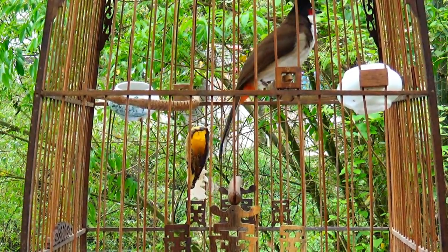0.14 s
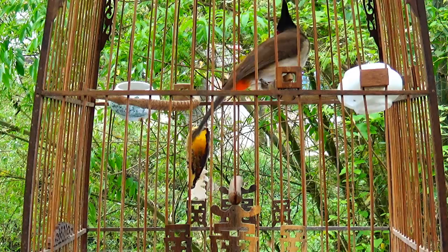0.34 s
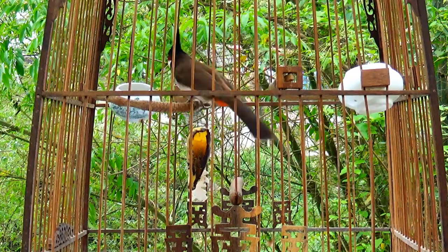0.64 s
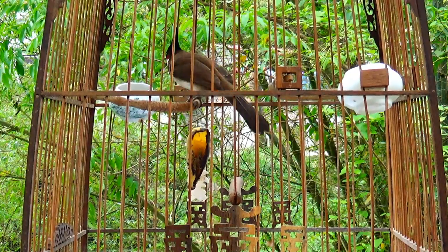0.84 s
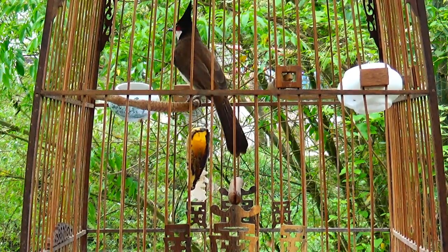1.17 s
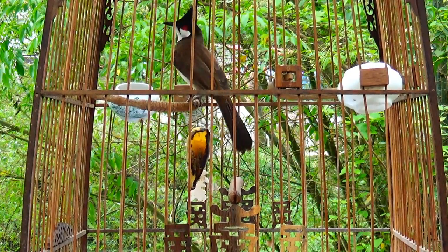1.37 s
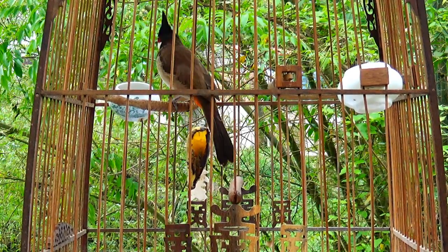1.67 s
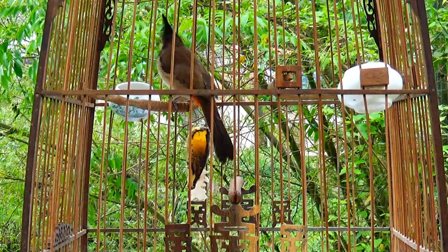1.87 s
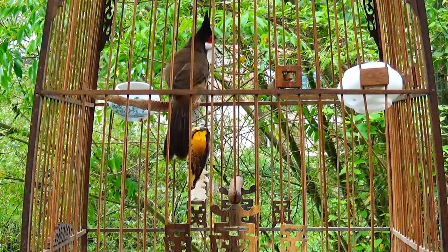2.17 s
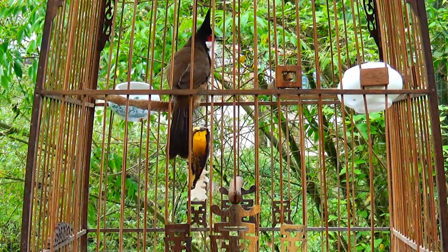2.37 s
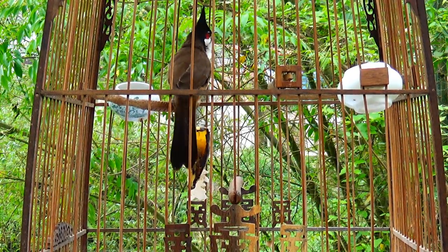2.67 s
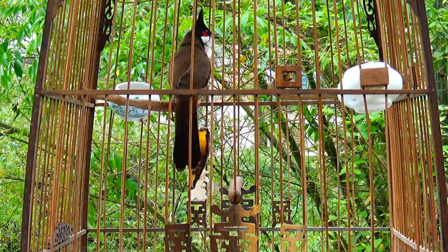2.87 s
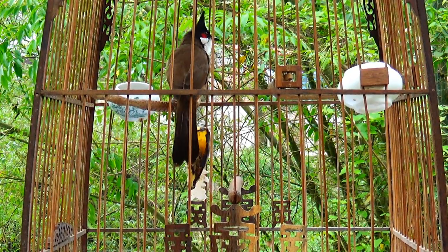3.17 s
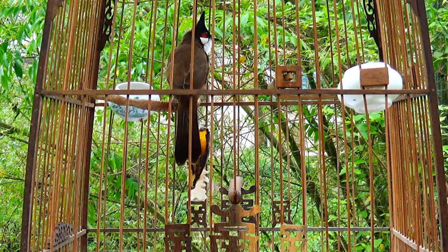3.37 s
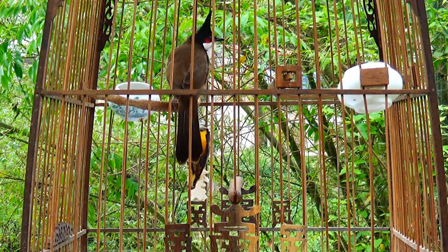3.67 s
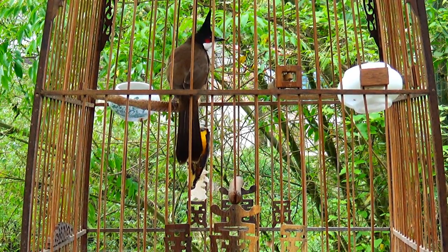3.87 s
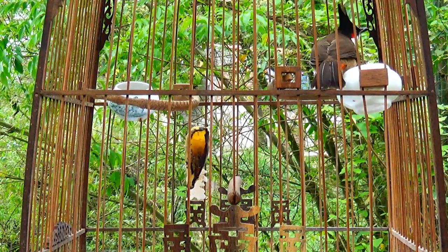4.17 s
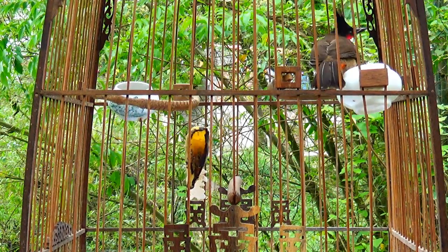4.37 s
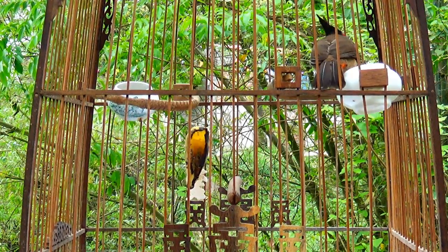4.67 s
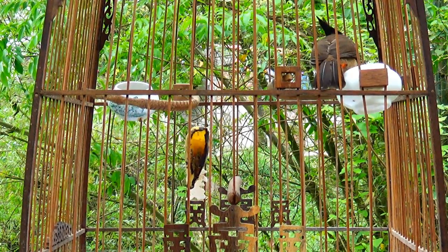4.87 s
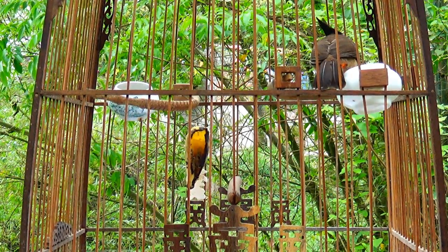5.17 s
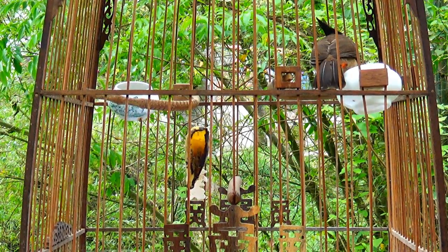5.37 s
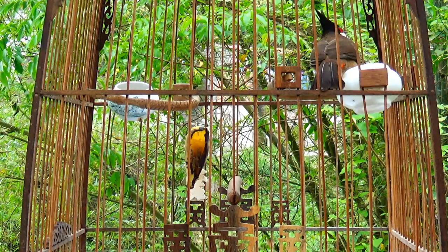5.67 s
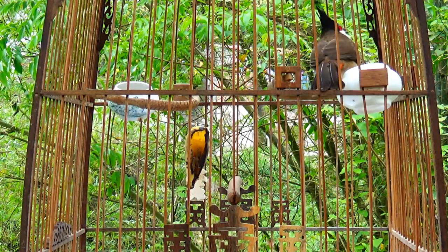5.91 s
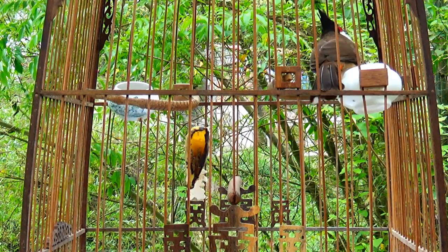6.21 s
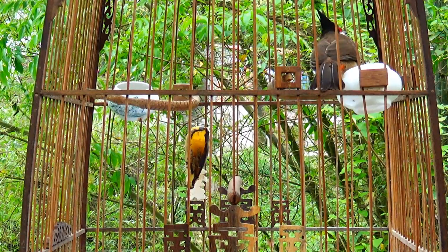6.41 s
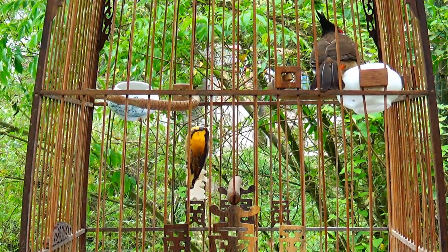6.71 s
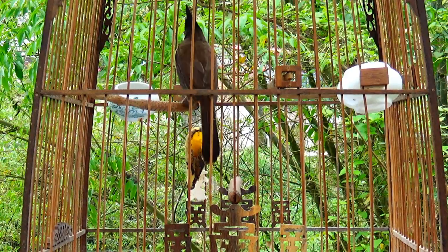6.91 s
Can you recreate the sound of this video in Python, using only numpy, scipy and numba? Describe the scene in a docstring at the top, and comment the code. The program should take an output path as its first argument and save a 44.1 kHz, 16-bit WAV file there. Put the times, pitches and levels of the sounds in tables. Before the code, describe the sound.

A garden ambience of soft low hum and leafy hiss continues throughout, swelling slightly. At 0 s the echo of a bird's whistle dies away with tiny chips. Around 0.5-0.7 s dry wing ticks and a faint rustle cross the cage. Soft distant whistles slide upward near 0.9, 1.8 and 2.4 s, with buzzy chips at 1.5-2 s. From 2.2 to 3 s the near songbird sings loudly: a sharp upward flick, then rapid, clear, trilled whistles around 2-4 kHz, falling at the end. A single cluck comes at 3.3 s. Distant hoarse rooster crowing spans 3.9-5.2 s, while a thin high insect buzz runs from 4.2 to 6.8 s; a low hum swells at 4.5-5 s with small chips. The second loud phrase starts with one high whistle at 5.7 s, then tumbles quickly from 5.85 to 6.3 s, descending. A far rooster crows again at 6.1-6.8 s. A faint falling whistle begins at the close.

```python
"""Caged bulbul in a garden

A caged bulbul sings two loud phrases of trilled, sliding whistles: frequency-modulated tones with faint overtones.
Soft arched chips lie between them, and a flutter of filtered-noise ticks and rustle crosses the cage once.
Birds in the trees slide pure whistles; a fowl clucks and a far rooster crows, harmonics through a throat.
Insects buzz as wing strokes ring a high resonance; a hum swells once; echoes and outdoor noise surround it all.
"""
import sys
import numpy as np
from scipy import signal
from scipy.fft import rfft, irfft, next_fast_len
from scipy.io import wavfile
from scipy.ndimage import uniform_filter1d, minimum_filter1d
from numba import njit

SR = 44100
rng = np.random.default_rng(int(sys.argv[2]) if len(sys.argv) > 2 else 0)


def unload_wav(signal):
    """Save mono or channel-first audio to the path in sys.argv[1] as 16-bit WAV at rate SR, clipped to [-1, 1]."""
    wavfile.write(
        sys.argv[1],
        SR,
        np.round(np.clip(np.atleast_2d(signal).T, -1, 1) * 32767).astype(np.int16),
    )


N = 310905
LEAD = 8820  # samples before time 0, cut off at the end, so that sounds and echoes are already under way
T = np.arange(-LEAD, N) / SR  # time in s
TOP_HZ = 15850  # upper limit of the sound

# the bulbul hops to the left perch, later back to the right: start_s, end_s of the first hop, then of the second
HOP = (.4, .7, 4., 4.3)


def amp(db):
    """Level law: decibels to amplitude gain."""
    return 10 ** (np.asarray(db) / 20)


def unit(x):
    """Normalisation to rms 1."""
    return x / np.sqrt(np.mean(x ** 2))


def colour(hz, points):
    """Spectral envelope: gain at hz, from (Hz, dB) points joined along log frequency."""
    f, db = np.transpose(points)
    return amp(np.interp(np.log(np.maximum(hz, 1)), np.log(f), db))


def resonance(hz, centre_hz, width_hz):
    """Gain of a single resonance, 1 at its centre and 3 dB down at the edges of its width."""
    return 1 / np.sqrt(1 + ((hz - centre_hz) / (width_hz / 2)) ** 2)


def noise(size, shape):
    """Filtered noise: a white spectrum is multiplied by shape(Hz) and scaled to rms 1."""
    padded = next_fast_len(size + 4096, True)
    spectrum = rfft(rng.standard_normal(padded))
    hz = np.arange(len(spectrum)) * SR / padded
    return unit(irfft(spectrum * shape(hz), padded))[:size]


def wander(size, rate_hz):
    """Smooth random fluctuation of spread 1: noise with a Gaussian low-pass spectrum."""
    return noise(size, lambda f: np.exp(-(f / rate_hz) ** 2))


def turn(hz):
    """Phase in radians as the running integral of a moving frequency."""
    return 2 * np.pi * np.cumsum(hz) / SR


def event(start_s, length_s):
    """Time window: the samples that an event covers, and the time since its start."""
    span = np.flatnonzero((T >= start_s) & (T <= start_s + length_s))
    return span, T[span] - start_s


def ramp(t, rise_s):
    """Linear onset from 0 to 1 within rise_s, steady afterwards."""
    return np.clip(t / max(rise_s, 1 / SR), 0, 1)


def hold(t, length_s, attack_s, release_s):
    """Amplitude envelope of attack, hold and release."""
    return ramp(t, attack_s) * ramp(length_s - t, release_s)


def throat_voice(hz, shape, count):
    """Source-filter voice: harmonics weighted by a throat of gain shape(Hz), at steady rms 1."""
    orders = np.arange(1, count + 1)[:, None]
    gains = shape(orders * hz)
    stack = np.sum(gains * np.sin(orders * turn(hz)), axis=0)
    return stack / np.sqrt(np.sum(gains ** 2, axis=0) / 2)


def outdoors(low_db=2, high_db=7, side_db=-18, flicker_db=1):
    """Broadband ambience: a low distant hum and the hiss of foliage, noise bands that swell slowly."""
    # background spectrum: frequency_hz, relative level_db
    air_spectrum = [(15, -37), (25, -14), (45, -9.5), (110, 0.5), (160, -4), (210, -6.5), (320, -4),
                    (450, -9), (1020, -11), (2060, -19.5), (3600, -22.5), (5900, -20), (9000, -28),
                    (15500, -31.5)]
    # slow swell, before low_db and high_db are added: time_s, hum level_db, hiss level_db
    swell = [(0, -53.5, -65.5), (.6, -55, -64.5), (1.4, -51.5, -61.5), (1.9, -47.5, -58), (2.4, -50, -59.5),
             (3.1, -52.5, -65), (4.15, -47, -59.5), (4.5, -48, -57), (5.5, -50.5, -58.5), (6.2, -54, -54),
             (6.6, -53, -63), (6.901, -49, -56)]
    s, *levels = np.transpose(swell)
    low, high = (np.interp(T, s, column) for column in levels)
    low_share = lambda f: 1 / (1 + (f / 1800) ** 4)  # power that belongs to the hum; the hiss has the rest

    def air():
        """One independent noise field."""
        hum = noise(len(T), lambda f: colour(f, air_spectrum) * np.sqrt(low_share(f)))
        hum = hum * amp(low + low_db + flicker_db * wander(len(T), 24))
        hiss = noise(len(T), lambda f: colour(f, air_spectrum) * np.sqrt(1 - low_share(f)))
        return hum + hiss * amp(high + high_db)

    # a common middle, and a weaker field of opposite sign in the two channels
    return air() + amp(side_db) * air() * np.array([[1], [-1]])


def note(melody, attack_s, release_s, bend):
    """Pitch follows pressure: a note scoops up, follows its melody and drops as the syrinx shuts."""
    scoop, scoop_power = 0.56, 4.8  # at full bend a note starts this share flat, until the pressure builds
    drop, drop_s = 0.5, 0.00655  # share by which the pitch drops at full bend, and time scale of the drop
    glide_hz_per_s = 6600  # faster glides are trilled and rough; held pitches stay nearly pure
    held_trill = 0.1  # share of the trill that is left on a held pitch
    leap_hz_per_s, leap_dip_db = 105000, 7.5  # the voice weakens while it leaps this fast between registers
    attack_power = 1.18  # the tone grows as this power of the pressure behind it
    s, pitches = np.transpose(melody)
    s = np.sort(s)
    length_s = s[-1] - s[0]
    span, t = event(s[0], length_s)
    hz = uniform_filter1d(np.interp(T[span], s, pitches), size=64)  # even a leap takes a moment
    glide = uniform_filter1d(np.abs(np.gradient(hz)) * SR, size=128)
    trilled = held_trill + (1 - held_trill) * np.tanh((glide / glide_hz_per_s) ** 2)
    leaping = np.tanh((glide / leap_hz_per_s) ** 2)
    shut = np.exp(-((length_s - t) / drop_s) ** 2)
    hz = hz * (1 - bend * scoop * (1 - ramp(t, attack_s)) ** scoop_power)
    hz = hz * (1 - bend * drop * shut)
    strength = ramp(t, attack_s) ** attack_power * ramp(length_s - t, release_s)
    strength = strength * (1 - shut) * amp(-leap_dip_db * leaping)
    return span, hz, strength, trilled


def bulbul(jitter=0.0077, dip_db=45, half_db=-7, rasp_db=-39, shimmer=0.058, drift=0.08, waver_db=2.0,
           facing_db=4.0, away_db=-1.5):
    """Frequency-modulated whistle with faint overtones; alternate cycles differ (period doubling),
    which puts weaker lines halfway between the overtones."""
    # notes: level_db at middle_hz, attack_s, release_s, bend (share of scoop and drop, 0-1), trill_hz,
    # trill depth (share of the pitch on a fast glide), melody [(time_s, pitch_hz)]
    song_notes = [ (-5, 0.0052, 0.027, 0.12, 105, 0.085, [(-.06, 2600), (-.01, 2193), (.01, 2060)]),
                  (-2, 0.017, 0.0027, .4, 310, 0.063, [(2.2, 1900), (2.212, 2413), (2.22, 2390)]),
                  (-9.5, .003, 0.0047, .05, 300, 0.086, [(2.2, 2700), (2.204, 3290), (2.209, 4120),
                  (2.218, 5160)]), (-2.5, 0.0035, 0.035, 0.39, 262, .055, [(2.212, 3310), (2.24, 3506),
                  (2.262, 3835), (2.286, 3770)]), (-6.5, 0.00255, 0.026, .1, 216, 0.028, [(2.513, 2240),
                  (2.527, 2500), (2.53, 3130), (2.539, 3080), (2.543, 3480), (2.56, 3542), (2.586, 3400)]),
                  (-6, .048, .024, 1, 212, 0.043, [(2.65, 2602), (2.681, 2770), (2.688, 2762),
                  (2.718, 2821), (2.722, 3230), (2.755, 2920)]),
                  (-7, 0.013, 0.023, 1, 160, 0.04, [(2.779, 1967), (2.808, 2380), (2.821, 2310),
                  (2.824, 2780), (2.836, 3054), (2.856, 3033), (2.861, 2435), (2.879, 2090),
                  (2.909, 2110)]), (-9.5, 0.027, 0.041, .25, 170, 0.031, [(2.917, 2765), (2.948, 2517),
                  (2.968, 2436), (3.006, 2380)]), (-4.5, 0.024, 0.032, 0.19, 260, 0.061, [(5.676, 2430),
                  (5.693, 2730), (5.697, 3460), (5.705, 3177), (5.722, 3590), (5.736, 3775),
                  (5.755, 3710)]), (-5.5, 0.0057, 0.016, 0.51, 106, 0.087, [(5.855, 2690), (5.872, 2844),
                  (5.882, 3320), (5.89, 3510), (5.919, 3025)]),
                  (-5.5, 0.025, 0.026, 0.57, 102, 0.087, [(5.938, 2070), (5.96, 2363), (5.978, 2543),
                  (5.987, 2710), (6.001, 2710), (6.006, 3047), (6.018, 3164), (6.046, 3033)]),
                  (-7, 0.027, .003, 0.073, 110, 0.067, [(6.098, 1923), (6.121, 2176), (6.145, 2105),
                  (6.153, 2813), (6.165, 2885), (6.173, 2420), (6.182, 2198), (6.19, 2350), (6.199, 2270)]),
                  (-8, 0.01216, 0.0083, 0.058, 116, .04, [(6.191, 2017), (6.201, 1976), (6.205, 2546),
                  (6.233, 2510), (6.25, 2450)]), (-7.5, 0.00404, 0.037, .05, 122, 0.032, [(6.242, 2280),
                  (6.264, 2240), (6.269, 2450), (6.279, 2228), (6.293, 2172), (6.331, 1985)]), ]
    # overtones of the whistle: frequency_hz, level_db under the whistle
    overtone_spectrum = [(3000, -27.5), (4400, -37), (5300, -35.5), (6300, -31.5), (7400, -37.5),
                         (8700, -43), (10000, -30.5), (11200, -27.5), (13000, -43.5), (15000, -43.5)]
    louder_db_per_octave, middle_hz = 4.5, 2940  # high notes carry more
    held_rough = 0.45  # share of the rasp and jitter that is left on a held pitch
    rasp_shape = lambda f: colour(f, overtone_spectrum) * f / (f + 3000)
    # the beak beams the treble forward, so the voice is duller when the bird has its back turned
    beam = amp(np.interp(T, HOP, [away_db, facing_db, facing_db, away_db]))
    out = np.zeros(len(T))
    for level_db, attack_s, release_s, bend, trill_hz, depth, melody in song_notes:
        span, hz, strength, trilled = note(melody, attack_s, release_s, bend)
        size = len(span)
        rough = held_rough + (1 - held_rough) * trilled
        db = level_db + louder_db_per_octave * np.log2(hz / middle_hz) + waver_db * wander(size, 143)
        # no two flicks of the trill are alike in length or depth
        trill = turn(trill_hz * (1 + drift * wander(size, 100)))
        depth = depth * trilled * (1 + 0.23 * wander(size, 100))
        hz = hz * (1 - depth * np.sin(trill) + jitter * rough * wander(size, 600))
        phase = turn(hz)
        # air rasps through the syrinx, in the colour of the overtones
        overtones = amp(rasp_db) * rough * noise(size, rasp_shape)
        for k in np.arange(3, 17) / 2:  # orders 1.5 to 8 in half steps
            gain = amp(half_db * (k % 1 > 0)) * (k * hz < TOP_HZ)
            overtones += gain * colour(k * hz, overtone_spectrum) * np.sin(k * phase)
        voice = np.sin(phase) + overtones * beam[span]
        # the tone weakens on each upward flick of the trill
        db = db - dip_db * np.minimum(np.abs(depth), 0.09) * (1 - np.cos(trill)) ** 2 / 2
        out[span] += np.sqrt(2) * voice * strength * amp(db) * (1 + shimmer * wander(size, 400))
    return out


def cage(x):
    """Early reflection: bars, perch and food cups throw the song back within milliseconds."""
    # reflections: delay_s, level_db
    cage_echoes = [(.0021, -22.5), (.0046, -17.5)]
    return x + sum(amp(db) * np.interp(T - s, T, x) for s, db in cage_echoes)


def chips(arch=0.51, trill_hz=170, depth=0.098, upper_db=-20):
    """Rapid frequency modulation: quiet, buzzy notes flick up and fall within a few hundredths of a second."""
    # chips: middle_s, length_s, top pitch_hz of the arch, level_db
    chip_notes = [(0.083, 0.051, 3645, -44.5), (0.069, 0.027, 5820, -50.5), (1.55, 0.059, 3710, -42.5),
                  (1.658, 0.036, 4050, -45.5), (1.812, 0.048, 5040, -37), (2.004, 0.047, 5050, -41.5),
                  (3.031, 0.036, 5970, -50.5), (3.038, 0.03, 4120, -48.5), (3.169, 0.028, 7200, -54),
                  (3.18, 0.038, 5390, -47.5), (4.114, 0.042, 4720, -45.5), (4.748, 0.055, 4650, -40),
                  (4.78, 0.052, 3770, -42.5), (5.287, 0.035, 4660, -50.5)]
    out = np.zeros(len(T))
    for middle_s, length_s, top_hz, db in chip_notes:
        span = np.flatnonzero(np.abs(T - middle_s) < length_s / 2)
        u = np.linspace(-1, 1, len(span))  # position within the chip
        trill = depth * np.sin(2 * np.pi * trill_hz * T[span])
        phase = turn(top_hz * (1 - arch * u ** 2 + trill + 0.04 * wander(len(span), 840)))
        tone = np.sqrt(2) * np.sin(phase) + amp(upper_db) * np.sin(2.5 * phase)
        out[span] += amp(db) * np.cos(np.pi / 2 * u) * tone
    return out


def flutter(decay_s=0.0018, rustle_db=-55):
    """Impulsive noise: as the bird crosses the cage, dry ticks stand over a brief rustle of feathers."""
    # wing flicks and claws on the cage bars: start_s, level_db
    ticks = [(0.504, -43.5), (.513, -56), (.542, -46), (0.559, -34.5), (.578, -52), (.635, -44),
             (.642, -46), (0.68, -40), (.687, -46), (.696, -40.5)]
    # spectrum of ticks and rustle: frequency_hz, relative level_db
    tick_spectrum = [(500, 3.5), (3500, -6), (7000, -1), (11000, 2.5), (15500, -6)]
    envelope = amp(rustle_db) * np.exp(-((T - 0.61) / 0.041) ** 2)
    for s, db in ticks:
        envelope += amp(db) * (T >= s) * np.exp(-np.abs(T - s) / decay_s)
    return envelope * noise(len(T), lambda f: colour(f, tick_spectrum))


def whistlers():
    """Exponential glide: pure whistles from the trees slide quickly at first and settle on their last pitch."""
    # whistles: start_s, length_s, first pitch_hz, last pitch_hz, settle_s, relative level_db
    whistles = [(.86, 0.36, 1802, 2690, 0.17, -52), (1.511, 0.048, 5300, 5180, 0.025, -49.5),
                (1.515, .028, 6020, 6110, .022, -49), (1.76, 0.43, 1800, 2700, 0.18, -45.5),
                (2.369, 0.5, 1860, 2660, 0.1, -44), (4.97, 0.28, 4500, 4340, 0.25, -54.5),
                (5.26, .15, 4380, 4370, .1, -55.5), (6.887, 0.18, 3300, 1560, 0.065, -37.5)]
    attack, release = 0.29, 1  # shares of the length
    out = np.zeros(len(T))
    for s, length_s, first_hz, last_hz, settle_s, db in whistles:
        span, t = event(s, length_s)
        progress = np.expm1(-t / settle_s) / np.expm1(-length_s / settle_s)
        hz = first_hz + (last_hz - first_hz) * progress
        hz = hz * (1 + 0.0065 * wander(len(span), 107))
        envelope = hold(t, length_s, attack * length_s, release * length_s)
        out[span] += np.sqrt(2) * amp(db) * envelope * np.sin(turn(hz))
    return out


def insects(width_hz=120, scatter=0.32, drift=0.0073):
    """Pulsed resonance: rapid wing strokes ring one narrow, high band whose pitch sags within each stroke."""
    # buzzes: start_s, length_s, mean pitch_hz, level_db at the start
    buzzes = [(1.654, .65, 7750, -63), (4.223, 2.595, 6850, -47.5)]
    stroke_hz, stroke_sag_hz = 61, 750  # mean wing strokes a second, and the pitch fall within each
    edge_s, fade_db_per_s = 0.018, 2
    out = np.zeros(len(T))
    for s, length_s, hz, db in buzzes:
        span, t = event(s, length_s)
        size = len(span)
        stroke = turn(stroke_hz * (1 + 0.031 * wander(size, 7.16))) / (2 * np.pi) % 1  # 0-1 within a stroke
        phase = turn(hz * (1 + drift * wander(size, 4.8)) + stroke_sag_hz * (0.5 - stroke))
        # random in-phase and quadrature parts widen the line into a narrow band
        ring = (1 + scatter * wander(size, width_hz)) * np.sin(phase)
        ring += scatter * wander(size, width_hz) * np.cos(phase)
        envelope = amp(db - fade_db_per_s * t) * hold(t, length_s, edge_s, edge_s)
        out[span] += envelope * ring * (1 - 0.5 * np.cos(2 * np.pi * stroke))
    return out


def fowl(jitter=0.077, top_db=-24, attack_s=0.0019, release_s=0.018, opens_s=0.0013, shuts_s=0.033,
         rises_s=0.0503, falls_s=0.0274):
    """Moving formant: a cluck starts low in the throat, then the beak snaps open and closes again."""
    # the cluck: start_s, length_s, level_db
    cluck = (3.309, 0.079, -30.5)
    # the open beak: start_s, length_s
    beak_open = (3.321, 0.061)
    # voice: pitch_hz at the ends, pitch_hz at the top of the arch
    cluck_hz = (436, 549)
    # throat resonance: frequency_hz with the beak shut, frequency_hz with it open
    cluck_throat_hz = (510, 2040)
    out = np.zeros(len(T))
    s, length_s, db = cluck
    span, t = event(s, length_s)
    beak = hold(T[span] - beak_open[0], beak_open[1], opens_s, shuts_s)
    hz = np.interp(hold(t, length_s, rises_s, falls_s), [0, 1], cluck_hz)
    hz = hz * (1 + jitter * wander(len(span), 600))
    throat_hz = np.interp(beak, [0, 1], cluck_throat_hz)
    # the wider the beak, the higher the resonance, the less chest tone and the more treble
    opening = throat_hz / 2200

    def throat(f):
        """Gain of main resonance, chest and treble."""
        chest = 0.3 / opening ** 2 * resonance(f, 564, 240) ** 2
        treble = amp(top_db) * opening * resonance(f, 4600, 2500) ** 2
        return resonance(f, throat_hz, 840) ** 2 + chest + treble

    out[span] = amp(db) * hold(t, length_s, attack_s, release_s) * throat_voice(hz, throat, count=12)
    return out


def rooster(jitter=0.0886, onset_hoarse=0.888):
    """Source-filter crowing: a voice mixed from harmonics and hoarse noise excites a long throat."""
    # syllables of two distant crows: start_s, length_s, middle pitch_hz, glide_hz_per_s, relative level_db,
    # level change_db_per_s, hoarseness (0-1) once the onset is over, upper resonance level_db at the start
    syllables = [(3.9, .27, 551, -150, -43.5, -32, 1, -12.5), (4.231, 0.21, 589, 2, -45.5, -26, 0.93, -7),
                 (4.381, 0.31, 499, 170.5, -33.5, 2, 0.11, -1.5),
                 (4.779, 0.42, 490, 1.5, -42.5, -5, 0.67, -9), (6.135, 0.36, 498.7, 89, -33.5, -26, .05, 2),
                 (6.481, .33, 514, -100, -43, -9, 0.76, -7.5)]
    # upper resonances of the throat: centre_hz, width_hz, relative level_db
    throat_peaks = [(2314, 420, -4.5), (3780, 500, -15.5), (5700, 170, -15.5), (7040, 900, -17)]
    attack_s, release_s = 0.028, 0.068
    settle_s = 0.0848  # time scale on which the hoarseness of the onset gives way to that of the syllable
    brightens_db_per_s = 6  # the beak opens wider through a syllable and lifts the upper resonances
    lower = lambda f: resonance(f, 1080, 424) ** 2 / (1 + (720 / f) ** 6)

    def upper(f):
        """Gain of the upper resonances."""
        peaks = sum(amp(db) * resonance(f, centre, width) ** 2 for centre, width, db in throat_peaks)
        return peaks / (1 + (f / 7500) ** 12)

    out = np.zeros(len(T))
    for s, length_s, pitch_hz, glide, db, fade_db, held_hoarse, upper_db in syllables:
        span, t = event(s, length_s)
        size = len(span)
        onset = np.exp(-(t / settle_s) ** 2)
        hoarse = np.clip(held_hoarse + (onset_hoarse - held_hoarse) * onset, 0, 1)
        bright = amp(upper_db + brightens_db_per_s * t)
        hz = (pitch_hz + glide * (t - length_s / 2)) * (1 + jitter * hoarse * wander(size, 223))
        tone = throat_voice(hz, lambda f: lower(f) + bright * upper(f), count=16)
        # where the voice breaks up, the same resonances ring with noise
        rough = (noise(size, lower) + bright * noise(size, upper)) / np.hypot(1, bright)
        envelope = amp(db + fade_db * t) * hold(t, length_s, attack_s, release_s)
        out[span] += envelope * (np.sqrt(1 - hoarse ** 2) * tone + hoarse * rough)
    return out


def drone(attack_s=0.14, release_s=0.15):
    """Slow amplitude modulation: a low, slightly unsteady sine swells and fades in the distance."""
    # the hum: start_s, length_s, mean pitch_hz, level_db
    distant_hum = (4.5, 0.54, 142.5, -51)
    out = np.zeros(len(T))
    s, length_s, hz, db = distant_hum
    span, t = event(s, length_s)
    tone = np.sin(turn(hz * (1 + 0.022 * wander(len(span), 30.2))))
    out[span] = np.sqrt(2) * amp(db) * hold(t, length_s, attack_s, release_s) * tone
    return out


def garden(x, near_db, tail_db, wall_db, near_t60=0.25, tail_t60=1.35, far_wall_db=-10, side_db=-15):
    """Reverberation as convolution with shaped noise: quick scatter from things nearby, two wall echoes
    and a long thin tail from the trees join the direct sound."""
    # wall echoes: delay_s of the near wall, delay_s of the far wall
    wall_delays = (.055, .215)
    t = np.arange(SR) / SR
    fade = lambda t60: unit(amp(-60 * t / t60) * (1 - np.exp(-t / 0.0025)))  # t60: seconds to fall by 60 dB
    echo = lambda s: unit(np.exp(-((t - s) / 0.029) ** 2))
    power = (amp(near_db) * fade(near_t60)) ** 2 + (amp(tail_db) * fade(tail_t60)) ** 2
    power += (amp(wall_db) * echo(wall_delays[0])) ** 2
    power += (amp(wall_db + far_wall_db) * echo(wall_delays[1])) ** 2
    dull = lambda f: 1 / np.sqrt(1 + (f / 12000) ** 2)

    def reflected():
        """One random set of reflections."""
        response = np.sqrt(power / SR) * noise(len(t), dull)
        return signal.fftconvolve(x, response)[:len(T)]

    mid, side = reflected(), reflected()
    return x + mid + amp(side_db) * side * np.array([[1], [-1]])


def scene(beam_hz=2900):
    """Superposition: the bulbul, left for its first phrase and right for the second, amid the garden."""
    pan_db = np.interp(T, HOP, [-0.53, 0.74, 0.36, -0.73])  # left over right
    song = cage(bulbul())
    # its high notes are beamed out into the garden and echo; its low ones stay nearly dry
    high_pass = signal.butter(2, beam_hz, "high", fs=SR, output="sos")
    beamed = signal.sosfiltfilt(high_pass, song)
    near = song - beamed + garden(beamed, near_db=-10.5, tail_db=-26.5, wall_db=-28.5)
    near = near * amp(np.array([pan_db, -pan_db]) / 2)
    soft = garden(chips() + flutter(), near_db=-6.0, tail_db=-11.0, wall_db=-29)
    yard = garden(fowl(), near_db=-8, tail_db=-15, wall_db=-36)
    trees = garden(amp(3.5) * whistlers(), near_db=-12, tail_db=-3.5, wall_db=-28)
    farm = garden(amp(-3.5) * rooster(), near_db=-4.5, tail_db=-9.5, wall_db=-13)
    return (near + soft + yard + trees + farm + insects() + drone() + outdoors())[:, LEAD:]


@njit
def follow(size, release):
    """Peak detection: the held value jumps up at once and sinks exponentially."""
    out, held = np.empty(len(size)), 0.
    for i in range(len(size)):
        held = max(size[i], held * release)
        out[i] = held
    return out


def record(dry, drive_db=1, ceiling=0.64, release_s=0.034):
    """Dynamic range limiting: a fast limiter levels the loudest notes, and a steep low-pass cuts the top."""
    loud = dry * amp(drive_db)
    peak = follow(np.abs(loud).max(axis=0), np.exp(-1 / (release_s * SR)))
    gain = minimum_filter1d(ceiling / np.maximum(peak, ceiling), size=88)
    gain = uniform_filter1d(gain, size=88)
    low_pass = signal.ellip(10, 0.2, 80, TOP_HZ, fs=SR, output="sos")
    return signal.sosfilt(low_pass, loud * gain)


dry = scene()
out = record(dry)
unload_wav(out)
```